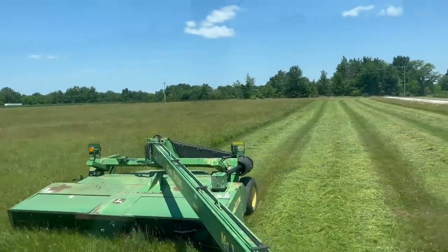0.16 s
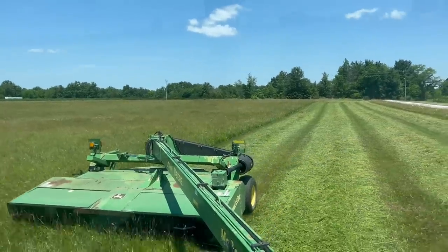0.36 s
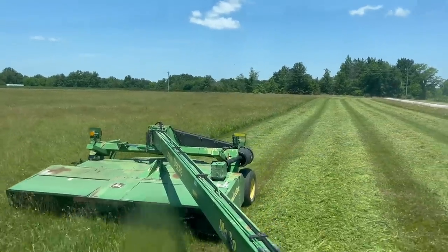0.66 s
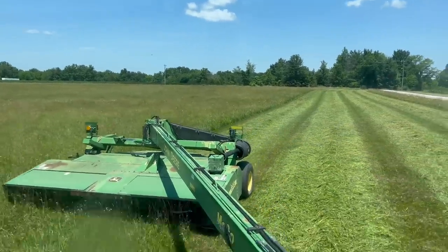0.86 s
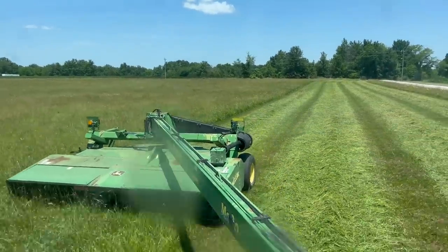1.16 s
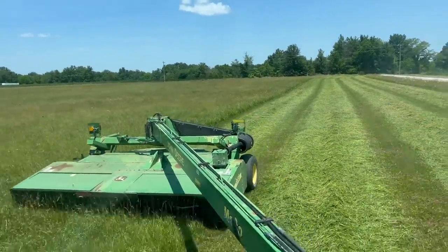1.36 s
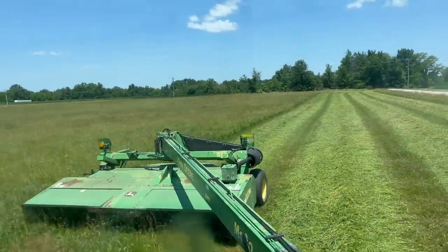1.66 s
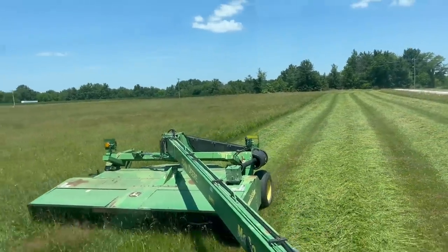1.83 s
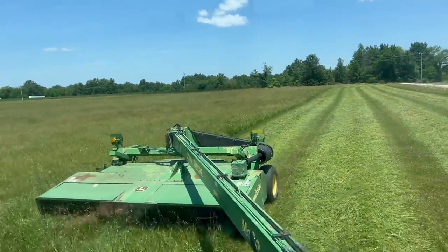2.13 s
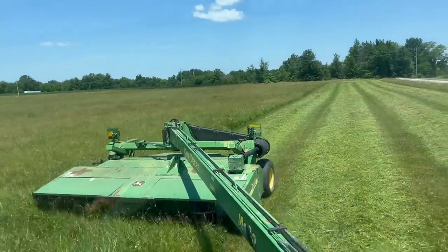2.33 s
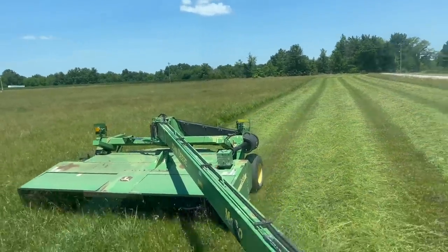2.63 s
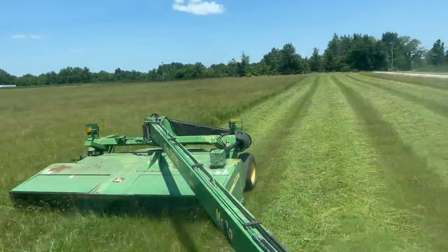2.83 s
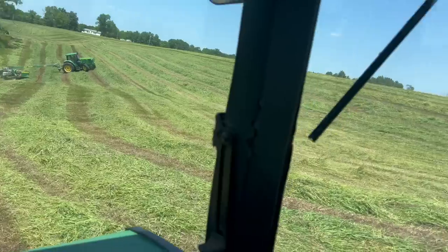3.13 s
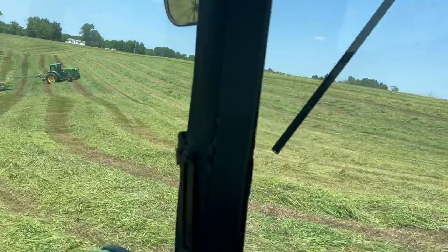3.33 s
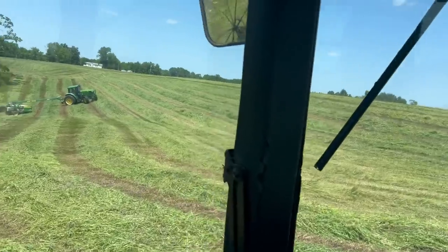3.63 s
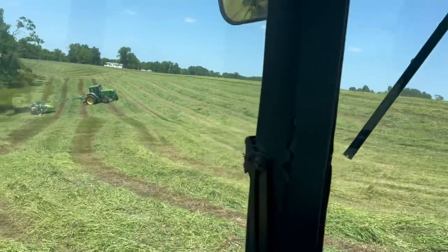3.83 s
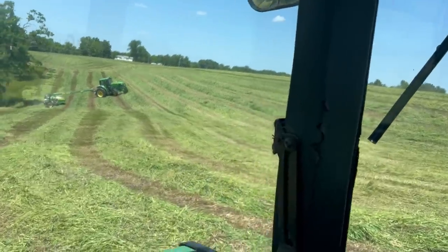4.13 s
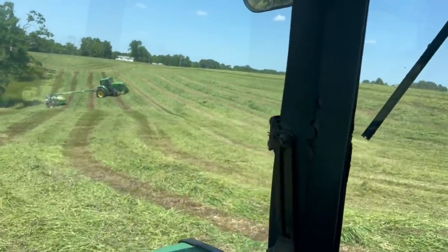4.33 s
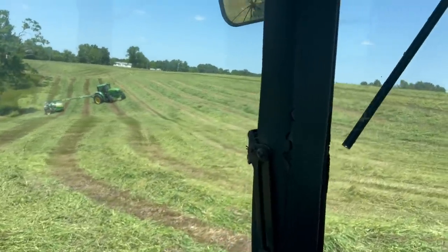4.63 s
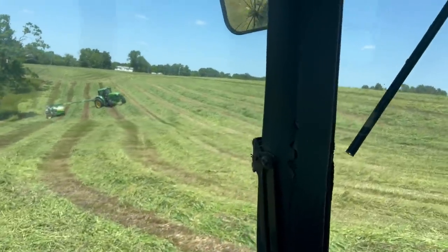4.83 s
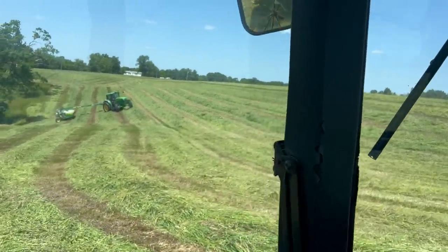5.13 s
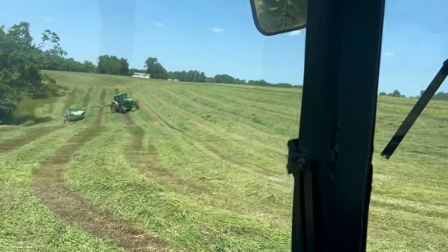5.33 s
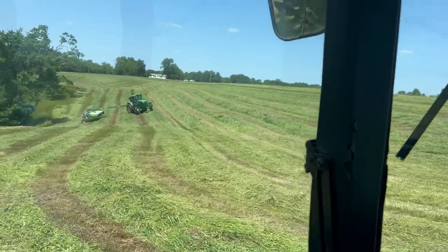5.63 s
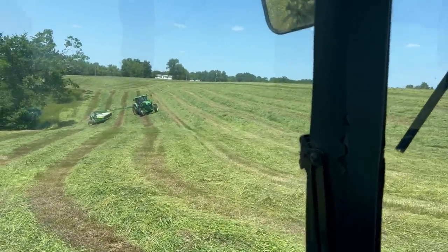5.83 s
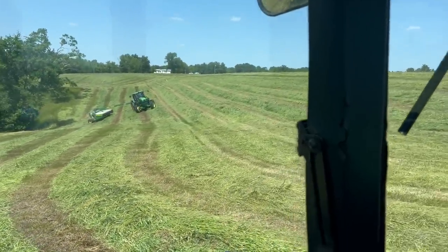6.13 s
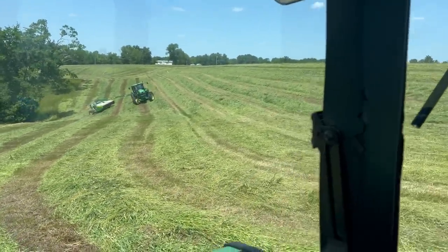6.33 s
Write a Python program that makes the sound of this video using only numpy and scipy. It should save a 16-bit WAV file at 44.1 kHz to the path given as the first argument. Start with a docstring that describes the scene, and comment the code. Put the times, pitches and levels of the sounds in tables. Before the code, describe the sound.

Steady high-revving tractor hum with faint gear whine, then a sudden switch to a louder lugging diesel drone, cab creaks, squeaks and brief rattles.

```python
"""A six-cylinder diesel tractor mows hay, heard inside its closed cab in two scenes that meet at about 3 s.
First it runs fast and muffled: tones locked to the engine's turning make a hum, and shaped noise makes
the rumble and roar. Knocks and noise ring the gears, steady tones whine, and filtered noise whistles thinly.
Then it runs slower and louder: the cab drones with the firings, the injector knocks ring, and filtered
noise and short gliding tones make trim creak, joints squeak and a loose fitting rattle."""
import sys
import numpy as np
from scipy import signal
from scipy.fft import rfft, irfft, next_fast_len
from scipy.io import wavfile
from scipy.ndimage import map_coordinates

SR = 44100
rng = np.random.default_rng(int(sys.argv[2]) if len(sys.argv) > 2 else 0)


def int16_out(signal):
    """Quantize to a 16-bit WAV file."""
    q = np.round(np.clip(np.atleast_2d(signal).T, -1, 1) * 32767)
    wavfile.write(sys.argv[1], SR, q.astype(np.int16))


N = 285327

CHANGE_S = 3.005  # middle of the cross-fade between the two scenes
TOP_HZ = 15800  # no sound is kept from here up

# Reach, below, is the time from the middle of a swell to where it has fallen to about 14 percent.
# Left-right is the left level minus the right.

# Engine speed. Each row: time in seconds, engine cycles per second (a cycle is two crank turns).
FAST_SPEED = [(0, 19.55), (.45, 19.51), (.65, 19.44), (.85, 19.47), (1.03, 19.55), (1.17, 19.46),
              (1.3, 19.54), (1.6, 19.55), (1.8, 19.5), (2.35, 19.52), (2.52, 19.44), (2.68, 19.49),
              (3.0, 19.44)]
SLOW_SPEED = [(3, 11.8), (3.14, 11.71), (3.27, 11.69), (3.42, 11.95), (3.63, 11.95), (3.72, 12.11),
              (3.85, 12.13), (4.06, 11.75), (4.19, 11.73), (4.44, 12.07), (4.76, 12.04), (4.93, 11.8),
              (5.03, 11.8), (5.2, 12.02), (5.3, 12.02), (5.46, 11.77), (5.56, 11.77), (5.76, 12.08),
              (5.88, 12.08), (6.06, 11.73), (6.26, 11.77), (6.47, 11.68)]
# Tones locked to the engine. Each row: multiple of the cycle rate, rms level in dB, left-right in dB.
FAST_ORDERS = [(2, -52, -2), (3, -47, 3), (6, -42, 4), (7, -48, -3), (9, -46.5, 1), (12, -46, 1),
               (14, -54, -3), (16, -39.3, -1), (18, -57, 6), (20, -58, -3), (24, -60, 3), (28, -62, 2),
               (32, -56.5, -4), (44, -60, 0), (141, -67, -4)]
# The same for the slow engine at its middle speed. Each row: multiple of the cycle rate, rms level in dB,
# left-right in dB, dB gained per extra cycle per second.
SLOW_ORDERS = [(9, -40, 4, 0), (11, -41, 5, -4), (18, -37.5, -2, 14), (24, -39.8, -3, 14), (30, -39, -5, 5),
               (32, -37, -5, 5), (34, -50, -4, -14), (36, -47, -4, -18), (42, -46, -6, 4), (45, -51, -6, 6),
               (48, -55, -8, 6), (51, -57, -1, 6), (60, -55, 2, 6), (70, -55, 3, 10), (87, -54, -4, 6),
               (93, -53, -5, 0), (96, -58, 2, 0), (105, -56, -5, 6)]
# Belt- and shaft-driven parts. Each row: pitch in Hz, rms level in dB before thick hay, left-right in dB.
FAST_DRIVE = [(45.8, -52.5, 2), (94.6, -41.5, -0.5), (887, -61, 5), (1362, -63, -4), (2132, -70, -8)]

# Relative strength of each cylinder's knock, in dB, in firing order.
FAST_CYLINDERS = [0.26, -1.2, -0.61, -0.43, 0.98, -1.3]
SLOW_CYLINDERS = [0, -.3, -1, .3, .3, 2.5]
# The same for the cylinders as they shake the air and panels of the cab, in dB.
BOOM_CYLINDERS = [1.2, 0.071, 0.34, 1, 0.14, -1.3]

# Colour of each noise layer. Each row: frequency in Hz, relative level in dB.
FAST_RUMBLE = [(12, -25), (22, -15), (40, -22), (65, -8), (85, -4), (108, 4.5), (135, -5), (170, -9),
               (300, -72)]
SLOW_RUMBLE = [(12, -45), (25, -20), (40, -13), (55, -6), (73, -1), (88, -3.5), (102, -2.5), (125, -0.5),
               (150, -17), (300, -95)]
FAST_ROAR = [(70, -57), (135, -26), (160, 9), (200, 4), (225, 10), (255, 9.5), (290, 4), (320, 1.5),
             (365, -6), (450, -4), (520, -7.5), (700, -10.5), (1100, -60)]
SLOW_ROAR = [(80, -27), (135, 4), (190, -3), (235, 3), (265, 1), (300, 4), (330, -1), (390, 3), (455, -4),
             (510, 0), (570, -8), (650, -17), (1100, -82)]
FAST_BLOCK = [(300, -56), (650, -4.5), (880, 4.5), (1060, 2), (1250, 3), (1470, 3), (1620, -4.5),
              (1850, -1.5), (2050, -4.5), (2500, -4.5), (2900, -25), (3150, -7.5), (3900, -20), (6000, -69)]
SLOW_BLOCK = [(300, -44), (650, 3), (900, 3), (1250, 4), (1600, -3.5), (1950, -4.5), (2500, -8),
              (3100, -8.5), (3900, -15), (6000, -99)]
FAST_HISS = [(2000, -40), (4000, 0), (5300, 1), (6400, -2), (7300, -9), (8070, -4.5), (8900, -10.5),
             (11800, -12.5), (13200, -21), (15500, -21)]
SLOW_HISS = [(2000, -40), (4100, 0), (5000, -1), (5800, -1), (6550, 2), (7150, -8), (9000, -10),
             (12200, -12.5), (13500, -23), (15500, -20)]
# Colours of the cab rocking on its mounts and of the loose fitting, with the same columns.
SWAY = [(14, -27), (28, 15), (40, 13.5), (52, 12), (75, -36.5)]
FITTING = [(400, -22), (1200, -4), (2500, -1), (4000, 0), (6500, 0), (9000, -5), (12000, -8), (15500, -16)]
# Stereo width. Each row: frequency in Hz, side minus middle in dB.
WIDTH = [(50, -44), (120, -9), (280, -8), (450, -3.5), (700, 3.5), (1400, -5), (3000, 0), (14000, 0)]
# Stereo balance. Each row: frequency in Hz, left-right in dB.
FAST_BALANCE = [(60, -4), (120, 0.5), (210, 1), (300, 0.5), (650, -3.5), (900, 1), (2400, -3.5),
                (4400, 5.5), (8000, -1)]
SLOW_BALANCE = [(40, 3), (120, 4), (200, -10.5), (300, 0), (420, -3.5), (600, -4), (800, -1), (1200, -1.5),
                (2400, -10), (4400, 2.5), (8000, 0)]

# Resonances of the gear casing, whistle, injector knock, cab panels, trim and squeal.
# Each row: centre in Hz, half-width in Hz (where the ring is 6 dB down), relative level in dB.
GEARS = [(1200, 14, 1.5), (1344, 41, -3), (1831, 62, 0.5), (2778, 177, -2), (3566, 116, -10)]
WHISTLE = [(8450, 45, -6), (11750, 35, 0)]
KNOCK = [(1010, 26, 2.5), (1048, 28, 5), (1118.5, 23.5, 6), (1197, 42, 3.5), (1362, 51, -3), (1468, 35, 0)]
PANELS = [(715.5, 32, 1), (832, 21, 1), (1745, 50, 0.5), (1850, 32, -1), (2158, 86, -3), (2494, 190, -5),
          (4220, 67, -24)]
TRIM = [(5060, 22, -3), (5220, 50, -8), (5440, 30, 0), (5250, 600, -15), (10950, 120, -21)]
SQUEAL = [(4030, 25, -3), (4180, 35, 0)]

# Base rms levels in dB, before the swells, flutter and effort applied below.
FAST_RUMBLE_DB, FAST_ROAR_DB, FAST_CLATTER_DB, FAST_HISS_DB = -42, -37.5, -45.5, -58
SLOW_RUMBLE_DB, SLOW_ROAR_DB, SLOW_CLATTER_DB, SLOW_HISS_DB = -31.5, -29.5, -39.5, -48
KNOCK_DB, PANELS_DB, GEARS_DB, SWAY_DB = -41.5, -45.5, -50, -46.5

# The gear ring and hiss ease off late in the fast run.
EASE_S, GEARS_EASE_DB_PER_S, HISS_EASE_DB_PER_S = 2.45, 9, 1.5
# The slow engine pulls harder near the end, and its noise grows for each cycle per second of lost speed.
PULL_S, PULL_DB_PER_S, SAG_DB_PER_REV = 5.65, 2.5, 0.5
# The mower bites into thick hay. Each row: middle in seconds, reach in seconds,
# rise in dB, of which each layer takes its own share.
THICK_HAY = [(.76, 0.27, 3.5), (1.3, 0.23, 2.5), (2.56, .15, 2.5)]
# Uneven ground makes the cab rumble. Each row: middle in seconds, reach in seconds, rise in dB.
ROUGH_GROUND = [(3.58, 0.075, 5), (4.25, 0.46, 5.5), (5.1, 0.22, 2.5), (5.6, .2, 2.5)]
# The cab heaves on its mounts. Each row: middle in seconds, reach in seconds, rise in dB.
HEAVES = [(3.85, 0.18, 7), (4.35, 0.36, 3.7), (5.08, 0.15, 12.4), (5.8, 0.12, 9.3), (6.35, 0.22, 7.7)]

# Steady pitches of the two gear whines.
LOW_WHINE_HZ, HIGH_WHINE_HZ = 1175, 1832.5
# Their swelling and fading. Each row: time in seconds, rms level in dB before flutter.
LOW_WHINE = [(0.0, -76), (0.17, -54), (0.41, -69), (0.51, -52.5), (1.04, -54.5), (1.61, -51.5), (1.68, -74),
             (1.72, -63), (2.12, -55), (2.16, -74), (2.41, -49), (2.5, -62), (2.99, -56)]
HIGH_WHINE = [(0, -72), (.25, -67), (.45, -61), (.85, -56), (1.0, -63), (1.2, -59), (1.45, -57), (1.7, -61),
              (2.05, -59), (2.2, -66), (2.4, -55), (2.65, -54), (2.8, -67), (3, -71)]
# The faint whistle: its level at the start, its fade, and the reach of each flare.
WHISTLE_DB, WHISTLE_FADE_DB_PER_S, FLARE_S = -71, 2.2, .035
# Its loudest flares. Each row: middle in seconds, level in dB.
FLARES = [(.11, -62), (.39, -59), (.485, -61), (.56, -65), (.92, -63), (1.09, -63), (1.27, -61), (1.4, -64),
          (2.08, -66)]

# The cab booms at the firing rate. Each row: time in seconds, rms level in dB before flutter.
BOOM = [(3.0, -54), (3.2, -30), (3.46, -32), (3.56, -31), (3.74, -26), (4.08, -41), (4.34, -24),
        (4.66, -27), (4.8, -39), (4.95, -26), (5.3, -31), (5.42, -38), (5.7, -23.5), (5.98, -30),
        (6.15, -33), (6.46, -33)]
# The cab drones at twice the firing rate. Each row: time in seconds, rms level in dB before flutter.
DRONE = [(3.0, -24), (3.13, -26), (3.4, -33.5), (3.6, -35), (3.9, -29.5), (4.17, -24), (4.35, -31),
         (4.87, -27), (5.02, -35), (5.22, -26), (5.38, -24), (5.57, -27), (5.75, -31.5), (5.92, -27.5),
         (6.19, -24), (6.33, -25.5), (6.46, -22)]
# One ring of the knock wanders up and down. Each row: time in seconds, centre in Hz.
WANDER = [(3, 1230), (3.28, 1230), (3.38, 1320), (3.66, 1320), (3.8, 1200), (4.02, 1215), (4.17, 1285),
          (4.35, 1270), (4.6, 1200), (4.8, 1295), (5.02, 1300), (5.15, 1190), (5.38, 1190), (5.48, 1310),
          (5.72, 1310), (5.84, 1200), (6.0, 1285), (6.47, 1260)]
# Its half-width, base level, and growth for each cycle per second of lost speed.
WANDER_WIDTH_HZ, WANDER_DB, WANDER_DB_PER_REV = 67, -45, 15

# Bumps shake the cab. Each row: middle in seconds, reach in seconds, pitch in Hz, peak level in dB.
BUMPS = [(1.455, 0.012, 109, -25), (3.575, 0.016, 112, -12), (4.229, 0.016, 105, -17)]
# A loose fitting chatters. Each row: time of one contact in seconds, level in dB before the tap's shape.
RATTLES = [(3.679, -37.5), (3.685, -35.5), (6.239, -30), (6.246, -28), (6.426, -32), (6.430, -26.5),
           (6.436, -30)]
RATTLE_ATTACK_S, RATTLE_T60_S = .0006, .045  # time constant of the rise; time to fall by 60 dB
# Trim rubs and creaks. Each row: middle in seconds, reach in seconds, level in dB.
CREAKS = [(3.74, 0.027, -49), (3.885, .035, -46.5), (4.02, 0.028, -48), (4.8, 0.036, -45),
          (5.106, 0.025, -43.5), (5.341, 0.06, -50), (5.835, 0.035, -46), (6.31, .035, -47.5)]
# Dry joints squeak. Each row: middle in seconds, reach in seconds, pitch at the middle in Hz,
# glide in Hz per second, tremble in Hz, level in dB before a lift of 6.5 dB, left-right in dB.
SQUEAKS = [(3.35, .09, 3280, 900, 130, -50, -2), (3.735, .022, 5430, 0, 60, -49, 3),
           (3.901, .021, 8330, 0, 40, -52, -9), (4.947, .022, 8020, 0, 55, -38, -8),
           (4.966, .012, 7960, 0, 55, -44, -7), (5.108, .022, 5420, 3000, 70, -45, 2),
           (5.824, .024, 5130, 4000, 50, -44, 4), (5.847, .022, 5440, 2000, 35, -43, 4),
           (5.977, .018, 8120, 4000, 45, -49, -5), (6.398, .016, 8030, 0, 55, -36.5, -5),
           (6.41, .011, 8200, 6000, 55, -38.5, -5)]
# A faint squeal: its middle, reach and rms level at the middle before flutter.
SQUEAL_S, SQUEAL_REACH_S, SQUEAL_DB = 5.5, 1.0, -58


def amp(db):
    """Turn decibels into a gain."""
    return 10 ** (np.asarray(db) / 20)


def unit(pair):
    """Scale a stereo pair so that its middle has rms 1."""
    return pair / np.sqrt(np.mean(pair.mean(0) ** 2) + 1e-20)


def clock():
    """Time of every sample in seconds."""
    return np.arange(N) / SR


def since(s):
    """Seconds gone by after s, zero before."""
    return np.maximum(clock() - s, 0)


def along(points, hz):
    """Read a curve of (Hz, value) points along a log frequency axis."""
    f, v = np.transpose(points)
    return np.interp(np.log(hz + 1), np.log(f + 1), v)


def curves(rows):
    """One value per sample for each column after the time."""
    s, *columns = np.transpose(rows)
    return [np.interp(clock(), s, column) for column in columns]


def wobble(rate):
    """A smooth random curve with rate knots a second."""
    knots = rng.standard_normal(int(N * rate / SR) + 4)
    coarse = np.linspace(0, N / SR, 4096)
    return np.interp(clock(), coarse, map_coordinates(knots, [coarse * rate]))


def filtered(x, response):
    """Multiply the spectrum of x by a response of frequency."""
    m = next_fast_len(N + 8192, True)
    return irfft(rfft(x, m) * response(np.fft.rfftfreq(m, 1 / SR)), m)[..., :N]


def pan(db):
    """Left and right gains for a level difference."""
    gains = amp(np.array([[db], [-db]]) / 2)
    return gains / gains.mean()


def noise():
    """Two unrelated white noises."""
    return rng.standard_normal((2, N))


def swell(s, reach):
    """A bell-shaped envelope centred on s."""
    return np.exp(-2 * np.minimum(((clock() - s) / reach) ** 2, 20))


def rises(rows):
    """Add up swells in dB from rows of middle, reach and rise."""
    return sum(db * swell(s, reach) for s, reach, db in rows)


def in_cab(pair, spectrum, balance, lead):
    """Colour and widen a pair; part of the side is the middle out of step (lead above 0: left first)."""
    m = next_fast_len(N + 8192, True)
    hz = np.fft.rfftfreq(m, 1 / SR)
    mid, other = rfft(pair, m) * amp(along(spectrum, hz))
    # the shared, shifted part of the side shrinks towards the treble
    shifted = np.clip(lead, -1, 1) / np.hypot(1, hz / 3000)
    side = amp(along(WIDTH, hz)) * (np.sqrt(1 - shifted ** 2) * other + 1j * shifted * mid)
    gains = amp(np.outer([1, -1], along(balance, hz)) / 2)
    return unit(irfft(np.array([mid + side, mid - side]) * gains, m)[:, :N])


def ringing(pair, modes):
    """Pass a pair through a few resonances with steep skirts."""
    def response(f):
        total = 0
        for centre, width, db in modes:
            damping = 2j * f * width
            total = total + amp(db) * (damping / (centre * centre - f * f + damping)) ** 2
        return total
    return unit(filtered(pair, response))


def tones(turns, rows, waver_db, drift, rate, lead):
    """Tones at multiples of a rotation, wavering in strength and phase, out of step left and right."""
    out = np.zeros((2, N))
    for multiple, db, pan_db in rows:
        phase = 2 * np.pi * (multiple * turns + rng.random()) + drift * wobble(rate)
        level = amp(db + waver_db * wobble(rate))
        out += pan(pan_db) * (level * np.sqrt(2) * np.sin(phase))
    return filtered(out, lambda hz: 1 + 1j * lead * np.outer([1, -1], amp(along(WIDTH, hz))))


def firings(turns, cylinders, t60, scatter_db, loose):
    """Each cylinder knocks along its own path through the block; a loose share is fresh noise each time."""
    count = len(cylinders)
    t = np.arange(SR // 12) / SR
    decay = amp(-60 * t / t60)
    share = np.clip(loose, 0, 1)
    knocks = np.zeros((2, N))
    for k, db in enumerate(cylinders):
        at = np.searchsorted(turns, np.arange((k + .5) / count, turns[-1], 1))
        blows = np.zeros(N)
        blows[at] = amp(db + scatter_db * rng.standard_normal(len(at)))
        path = decay * rng.standard_normal((2, len(t)))
        repeated = signal.oaconvolve(blows[None], path, axes=1)[:, :N]
        energy = np.abs(signal.oaconvolve(blows ** 2, decay ** 2)[:N])
        knocks += np.sqrt(1 - share) * repeated + np.sqrt(share * energy) * noise()
    return unit(knocks)


def gear_ring(turns, knocks, bite_db):
    """Knocks and noise ring the gear casing, throbbing as the mesh is loaded."""
    # three throbs to every two engine cycles
    throb = amp(1.5 * np.sin(2 * np.pi * turns * 1.5) + .8 * wobble(14))
    level_db = GEARS_DB + 0.099 * bite_db + 0.84 * wobble(6.6) - GEARS_EASE_DB_PER_S * since(EASE_S)
    return amp(level_db) * pan(-2.1) * ringing((knocks + noise()) * throb, GEARS)


def whines():
    """Two gear meshes sing on steady pitches, each swelling in its own time."""
    rows = [(LOW_WHINE_HZ, curves(LOW_WHINE)[0], -4), (HIGH_WHINE_HZ, curves(HIGH_WHINE)[0], -3)]
    return tones(clock(), rows, waver_db=2.2, drift=.55, rate=13, lead=.6)


def whistle():
    """Noise through narrow resonances whistles high up, flickering faintly and flaring now and then."""
    idle_db = WHISTLE_DB - WHISTLE_FADE_DB_PER_S * clock() + 4.5 * wobble(16)
    flares = sum(amp(db) * swell(s, FLARE_S) for s, db in FLARES)
    return (amp(idle_db) + flares) * ringing(noise(), WHISTLE)


def fast_run():
    """High revs: clean engine tones, soft clatter, gear ring, whines and a fitful whistle."""
    turns = np.cumsum(curves(FAST_SPEED)[0]) / SR
    uneven_turns = turns + .0012 * wobble(12)
    knocks = firings(uneven_turns, FAST_CYLINDERS, t60=0.12, scatter_db=0.0, loose=0.51)
    hum = tones(turns, FAST_ORDERS, waver_db=0.14, drift=0.23, rate=5.5, lead=0.9)
    bite_db = rises(THICK_HAY)
    drive = amp(.7 * bite_db) * tones(clock(), FAST_DRIVE, waver_db=2.6, drift=1.0, rate=9, lead=.6)
    rumble_level = amp(FAST_RUMBLE_DB + 2.0 * wobble(7.45))
    rumble = rumble_level * in_cab(noise(), FAST_RUMBLE, FAST_BALANCE, lead=0.55)
    roar = amp(FAST_ROAR_DB) * in_cab(noise(), FAST_ROAR, FAST_BALANCE, lead=0.39)
    clatter_level = amp(FAST_CLATTER_DB + 0.61 * bite_db + 1.5 * wobble(16))
    clatter = clatter_level * in_cab(knocks + noise(), FAST_BLOCK, FAST_BALANCE, lead=0.34)
    gears = gear_ring(turns, knocks, bite_db)
    hiss_level = amp(FAST_HISS_DB - HISS_EASE_DB_PER_S * since(EASE_S) + 1.0 * wobble(22.1))
    hiss = hiss_level * in_cab(noise() + 0.22 * knocks, FAST_HISS, FAST_BALANCE, lead=.2)
    return hum + drive + whines() + rumble + roar + clatter + gears + hiss + whistle()


def tap(s):
    """The envelope of one light contact, which rises and dies quickly."""
    t = since(s)
    return (1 - np.exp(-t / RATTLE_ATTACK_S)) * amp(-60 * np.minimum(t / RATTLE_T60_S, 3))


def jolts():
    """Rough ground thumps the cab as short low tones, and a loose fitting chatters as taps of noise."""
    thumps = np.zeros(N)
    for s, reach, hz, db in BUMPS:
        thumps += amp(db) * swell(s, reach) * np.sin(2 * np.pi * hz * (s - clock()))
    chatter = sum(amp(db) * tap(s) for s, db in RATTLES)
    rough_noise = noise() * amp(1.3 * wobble(310))
    return thumps + chatter * in_cab(rough_noise, FITTING, SLOW_BALANCE, lead=0)


def drone(turns):
    """The cab sounds two deep tones with the slow engine: the firing rate and its octave."""
    octave_db, = curves(DRONE)
    boom_db, = curves(BOOM)
    phase = 2 * np.pi * len(SLOW_CYLINDERS) * turns
    boom = amp(boom_db + 1.5 * wobble(9.9)) * np.sin(phase + 0.18 * wobble(6.9))
    octave = amp(octave_db + 1.0 * wobble(12)) * np.sin(2 * phase + 0.17 * wobble(7))
    return np.sqrt(2) * (pan(2.1) * boom + pan(8.2) * octave)


def wandering_ring(pair, centre, width):
    """Pass a pair through one resonance whose centre moves."""
    # slide the centre down to 0 Hz, filter there, then slide it back
    turn = np.exp(2j * np.pi * np.cumsum(centre) / SR)
    pole = np.exp(-2 * np.pi * width / SR)
    return unit((turn * signal.lfilter([1], np.poly([pole, pole]), pair / turn)).real)


def injector_knock(knocks, sag):
    """The firings ring fixed resonances and one that wanders and grows as the revs sag."""
    steady = amp(KNOCK_DB + 1.5 * wobble(14)) * ringing(knocks, KNOCK)
    moving_level = amp(WANDER_DB + WANDER_DB_PER_REV * sag + 2 * wobble(16))
    moving = moving_level * wandering_ring(knocks, curves(WANDER)[0], WANDER_WIDTH_HZ)
    return pan(-4.0) * (steady + moving)


def slow_run():
    """Lugging under load: the cab drones and one cylinder knocks above the rest."""
    speed, = curves(SLOW_SPEED)
    turns = np.cumsum(speed) / SR
    knocks = firings(turns, SLOW_CYLINDERS, t60=.11, scatter_db=1.1, loose=.14)
    # the cab's booms run a small part of a cycle ahead of the knocks
    booms = firings(turns + .04, BOOM_CYLINDERS, t60=.13, scatter_db=1, loose=.5)
    sag = np.mean(SLOW_SPEED, axis=0)[1] - speed  # below zero when the engine runs faster
    partials = [(multiple, db - gain * sag, pan_db) for multiple, db, pan_db, gain in SLOW_ORDERS]
    hum = tones(turns, partials, waver_db=2.5, drift=.22, rate=7, lead=-.9)
    rumble_level = amp(SLOW_RUMBLE_DB + rises(ROUGH_GROUND) + 1.3 * wobble(10))
    rumble = rumble_level * in_cab(noise(), SLOW_RUMBLE, SLOW_BALANCE, lead=-0.56)
    sway = amp(SWAY_DB + rises(HEAVES)) * in_cab(noise(), SWAY, [(40, 0)], lead=0)
    roar_level = amp(SLOW_ROAR_DB + 1.1 * wobble(10))
    roar = roar_level * in_cab(booms, SLOW_ROAR, SLOW_BALANCE, lead=-0.39)
    knock = injector_knock(knocks, sag)
    panels = amp(PANELS_DB) * pan(-0.41) * ringing(booms, PANELS)
    clatter_mix = noise() + .5 * knocks
    clatter = amp(SLOW_CLATTER_DB) * in_cab(clatter_mix, SLOW_BLOCK, SLOW_BALANCE, lead=-1.23)
    hiss_level = amp(SLOW_HISS_DB + 0.57 * wobble(16))
    hiss = hiss_level * in_cab(noise() + 0.68 * knocks, SLOW_HISS, SLOW_BALANCE, lead=-.2)
    # when the revs sag the governor gives more fuel and the engine sounds harder
    effort = amp(SAG_DB_PER_REV * sag + PULL_DB_PER_S * since(PULL_S))
    return drone(turns) + hum + rumble + sway + effort * (roar + knock + panels + clatter + hiss)


def squeaks():
    """Rough rubbing rings the trim; clean stick-slip in a joint gives a trembling tone."""
    creak_level = sum(amp(db) * swell(s, reach) for s, reach, db in CREAKS)
    creak = creak_level * pan(7.3) * ringing(noise(), TRIM)
    unsteady = np.cumsum(wobble(450)) / SR
    offset = np.array([[0], [.2]])  # the right channel is a fifth of a cycle ahead
    squeak = np.zeros((2, N))
    for s, reach, hz, glide, tremble, db, pan_db in SQUEAKS:
        t = clock() - s
        cycles = hz * t + glide * t ** 2 / 2 + tremble * unsteady + offset
        squeak += pan(pan_db) * amp(db + 6.5) * swell(s, reach) * np.sin(2 * np.pi * cycles)
    return creak + squeak * amp(0.67 * wobble(150))


def squeal():
    """A faint rubbing squeal, noise through two resonances, comes and goes behind the engine."""
    level = amp(SQUEAL_DB + 2.0 * wobble(9)) * swell(SQUEAL_S, SQUEAL_REACH_S)
    return level * ringing(noise(), SQUEAL)


def scene():
    """The fast run gives way to the slow run in a quick cross-fade, with the small sounds on top."""
    second = np.clip((clock() - CHANGE_S) / 0.001 + .5, 0, 1)
    engine = (1 - second) * fast_run() + second * slow_run()
    return engine + jolts() + squeaks() + squeal()


def record(dry):
    """Keep only the sound below the top frequency."""
    return filtered(dry, lambda hz: hz < TOP_HZ)


dry = scene()
out = record(dry)
int16_out(out)
```